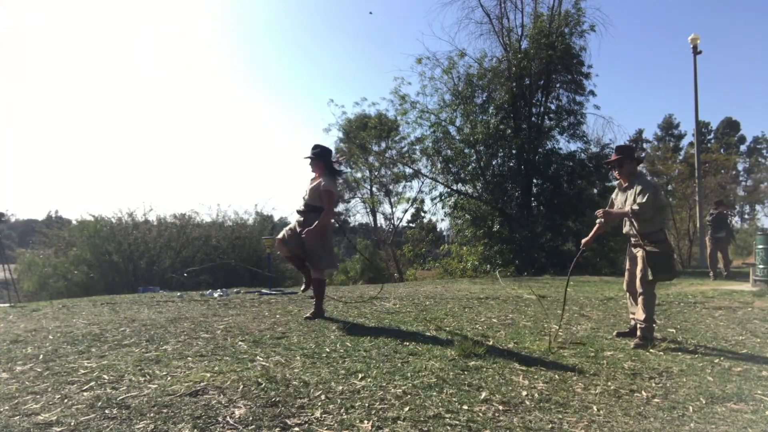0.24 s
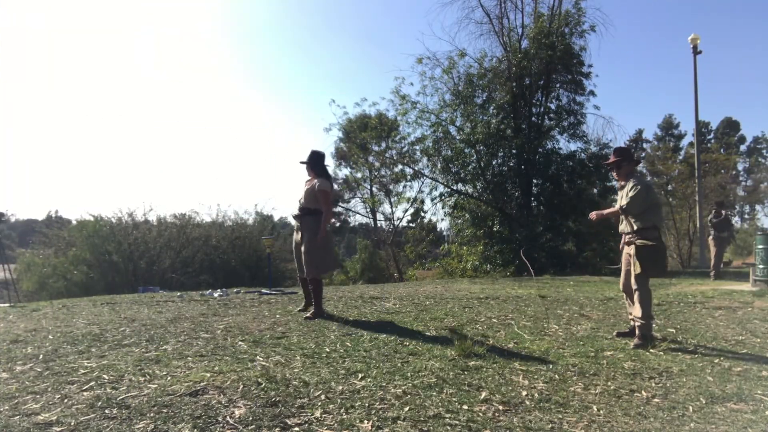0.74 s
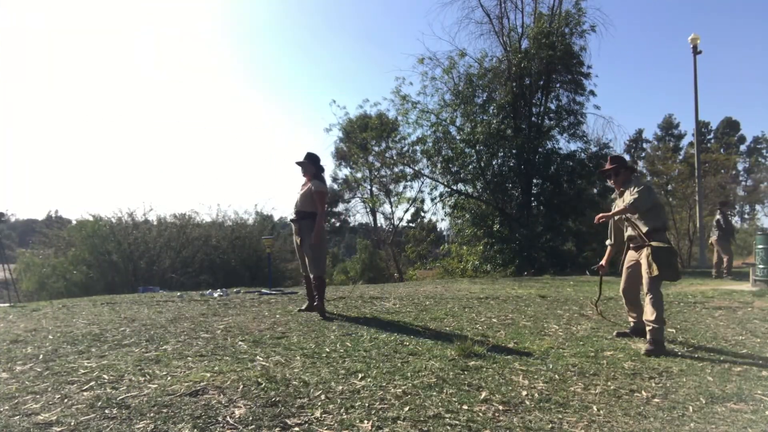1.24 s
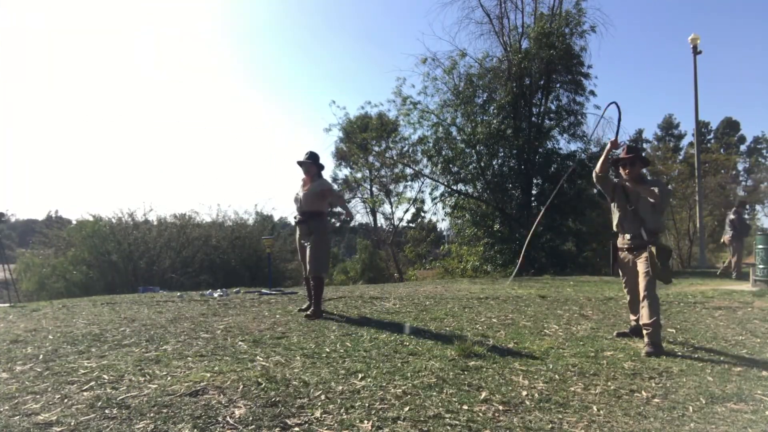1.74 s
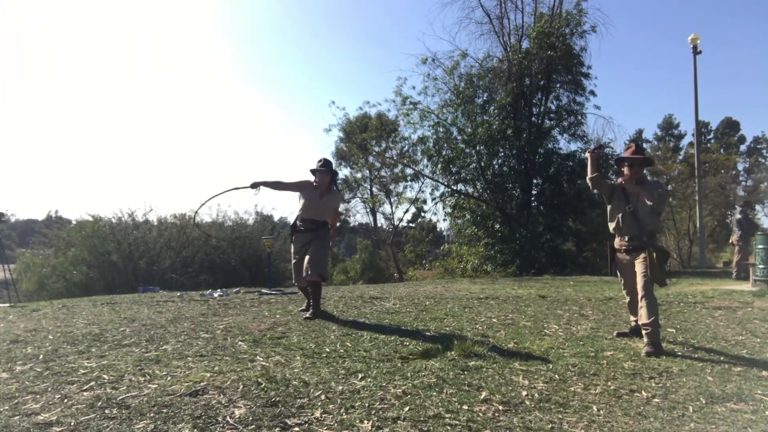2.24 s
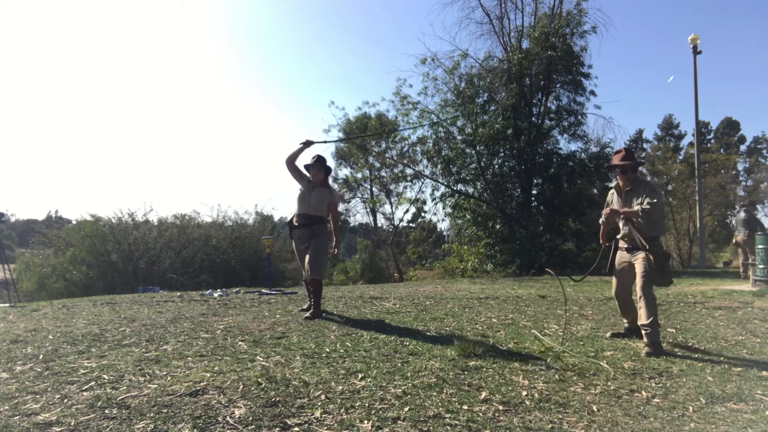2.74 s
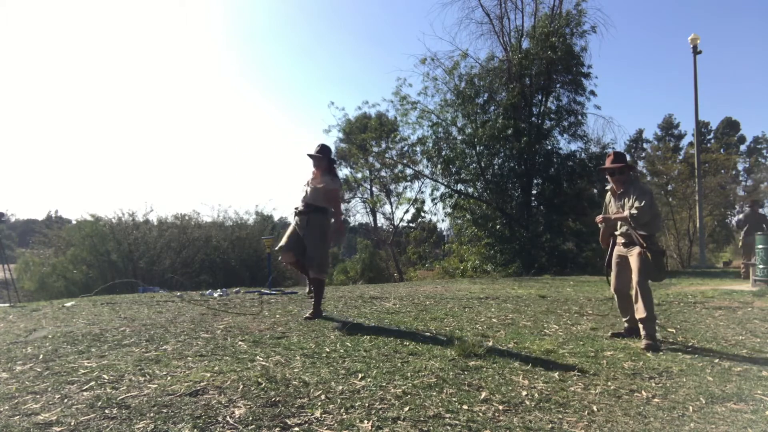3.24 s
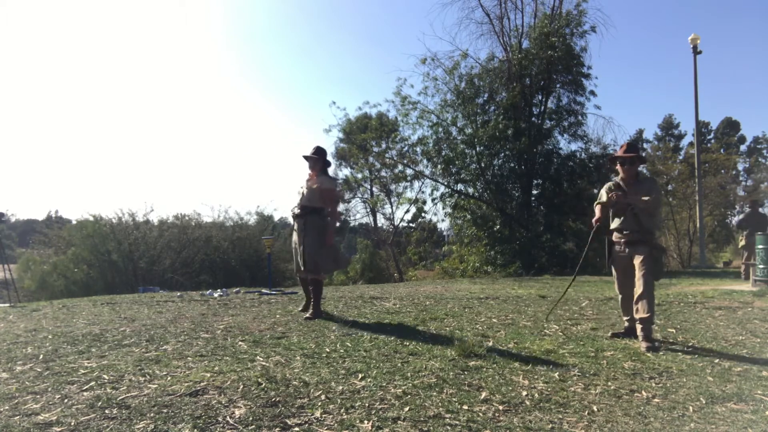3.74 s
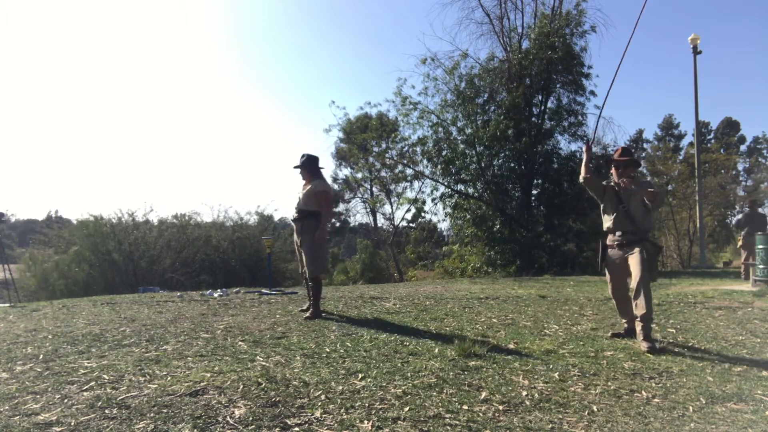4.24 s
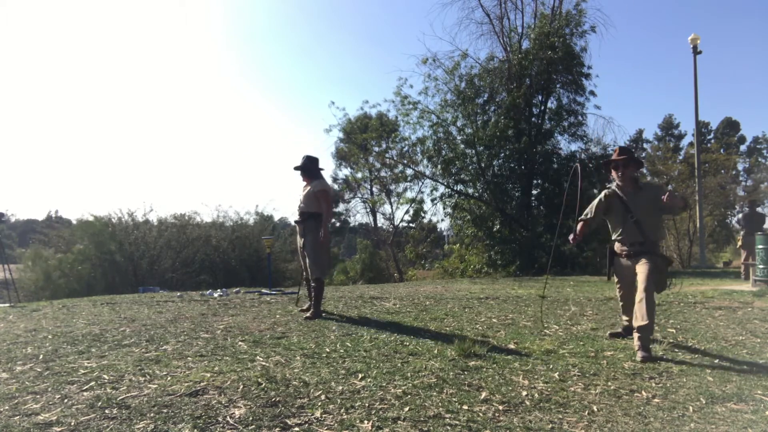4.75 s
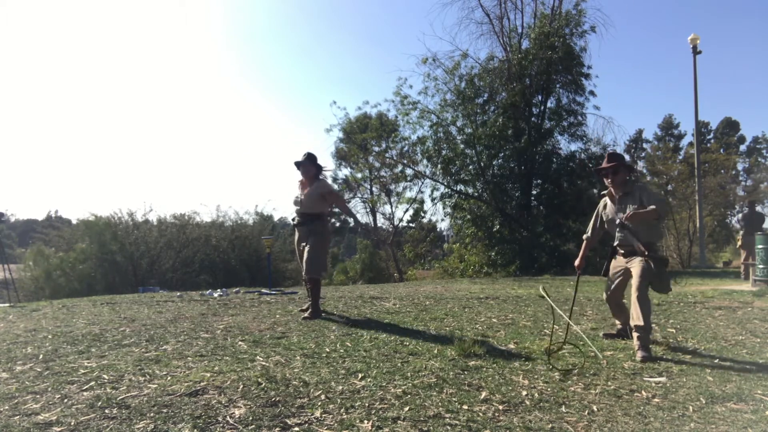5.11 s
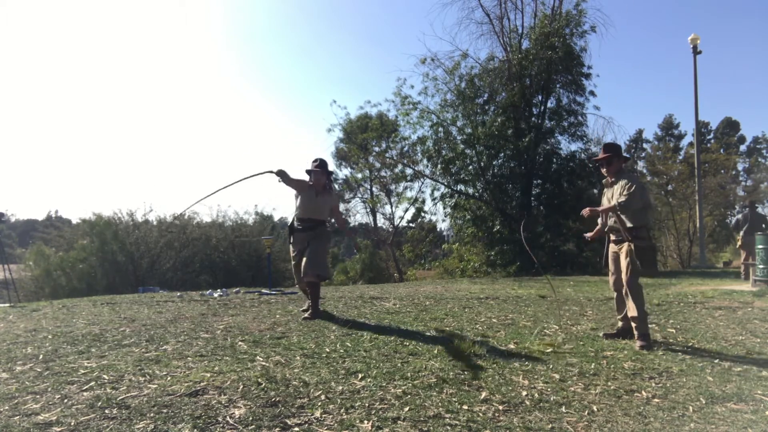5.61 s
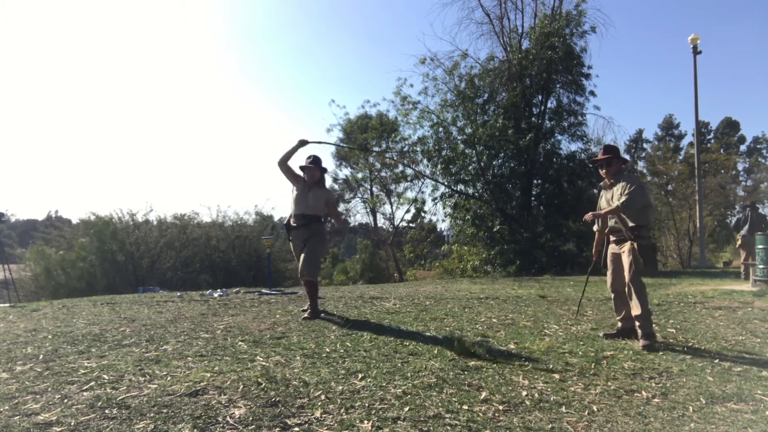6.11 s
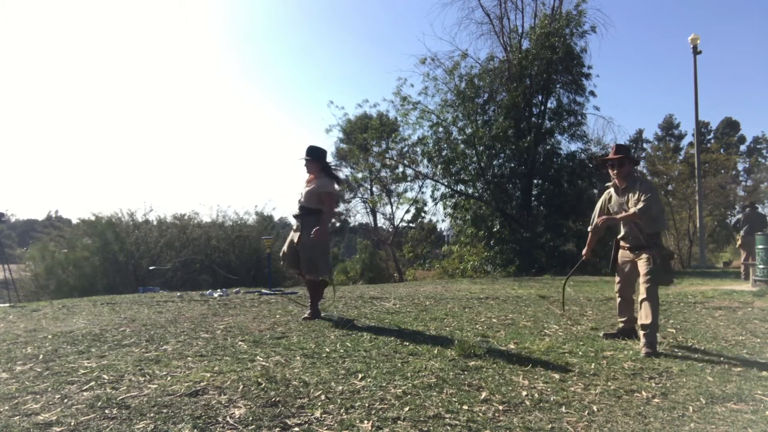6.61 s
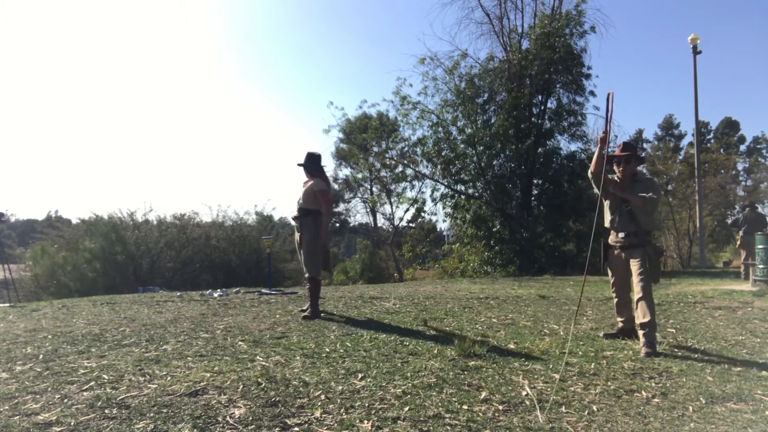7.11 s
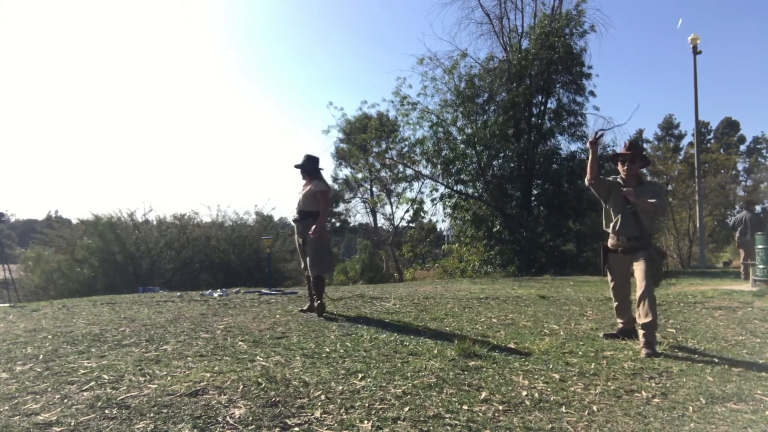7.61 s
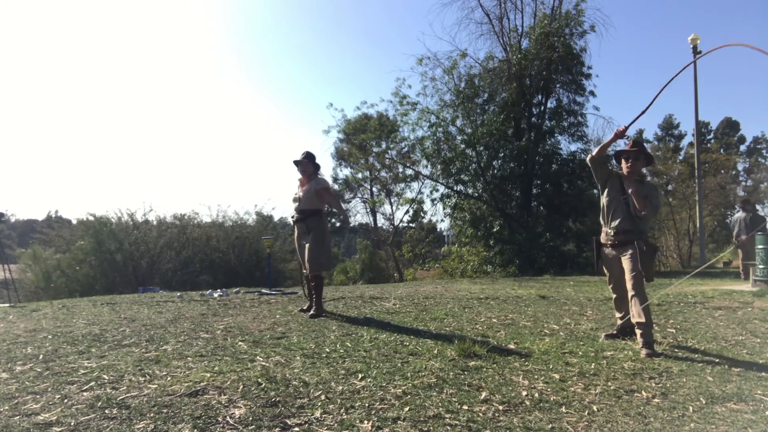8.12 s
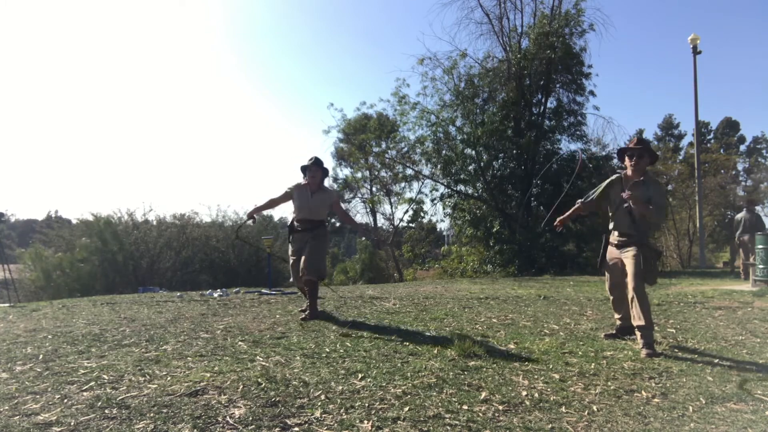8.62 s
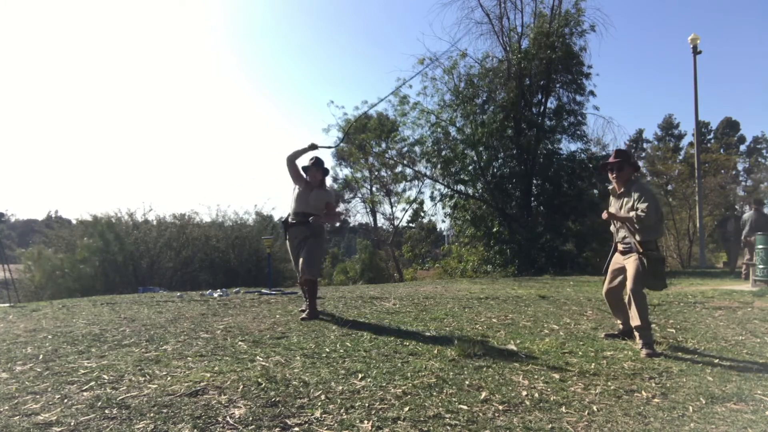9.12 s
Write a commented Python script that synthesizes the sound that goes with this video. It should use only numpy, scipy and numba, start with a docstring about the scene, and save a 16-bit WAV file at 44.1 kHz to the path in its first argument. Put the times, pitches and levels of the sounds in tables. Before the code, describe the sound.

Bullwhips crack on an open lawn, some metres from a microphone buffeted by low, gusty wind. A loud crack comes right at the start, a weaker one at about 1.1 seconds, then loud ones at 1.8, 2.6, 3.2, 4.9 and 6.4 seconds. A lighter snap at 7.2 seconds is followed by two heavy cracks at 8.0 and 8.7 seconds. Each is a sharp snap with a low thump, a quick slap of echo and a short tail scattering through trees. The hardest distort slightly and make the background dip for a moment. Between cracks the whips give thin whistling swishes, for example around 2.5, 4.0, 5.8 and 9.0 seconds, along with light ticks and faint drags through dry grass. The wind rumble continues throughout with occasional soft thuds, swelling at the end near 9.3 seconds, above a faint bed of distant traffic and leaves.

```python
"""Bullwhips crack on an open lawn, some metres from a phone whose microphone is buffeted by wind.
Each tip shrieks up through the sound barrier; its shock overloads the input into a falling thump,
slaps back off walls and scatters in the trees. Between cracks the thongs whistle, tick and drag through
dry grass, over a bed of distant traffic and leaves. The heaviest blows clip, and the gain control
ducks after them."""
import sys
import numpy as np
from scipy import signal
from scipy.fft import rfft, irfft
from scipy.io import wavfile
from scipy.ndimage import uniform_filter1d, minimum_filter1d
from numba import njit

SR = 44100
rng = np.random.default_rng(int(sys.argv[2]) if len(sys.argv) > 2 else 0)


def to_wav(sig):
    """Store sig (one row per channel, or 1-D mono) as 16-bit WAV at the path in sys.argv[1].

    Samples outside -1..1 are clipped; the rate is SR.
    """
    pcm = np.clip(np.atleast_2d(sig), -1, 1) * 32767
    pcm = np.round(pcm).astype(np.int16)
    wavfile.write(sys.argv[1], SR, pcm.T)  # frames by channels


N = 412776

# tone of the traffic and leaves: (frequency [Hz], relative density [dB])
PARK_SPECTRUM = [(90, -8), (190, 4), (270, -3.4), (400, -1.5), (994, -5), (1720, -14.5), (1850, -17.5),
                 (2660, -24.5), (3830, -28), (6130, -34.5), (15000, -40.5)]
# tone of the wind rumble: (frequency [Hz], relative density [dB])
WIND_SPECTRUM = [(12, -51), (20, -17.5), (43, -5.5), (59, 0), (103, -5), (145, -6), (236, -7.5),
                 (369, -15.5), (475, -29.5), (700, -30.5), (910, -60.5), (1540, -120)]
# wind level ride: (time [s], level [dB], upper band against the lows [dB])
WIND_GUSTS = [(0, -12, 2.5), (.2, -21.5, -2), (.65, -23.5, -9.5), (.72, -23, 6), (.9, -12, -12.5),
              (1.1, -17, -4.5), (1.4, -18, -1.5), (1.6, -22, -5), (1.75, -17, 1.5), (1.95, -24, -12),
              (2.2, -14.5, -11), (2.4, -22.5, -9.5), (2.75, -21.5, -6.5), (2.9, -13.5, -8.5),
              (3.15, -19.5, -4), (3.451, -24.5, -15), (3.9, -27, -13.5), (4.3, -26, -11.5),
              (4.65, -19, -2.5), (5.1, -18, -8), (5.399, -31.5, -15.5), (5.55, -22, -1),
              (6.0, -17.5, -11.5), (6.301, -22, -6.5), (6.7, -30, -14), (6.75, -18.5, -1.5),
              (7.1, -23.5, -4.5), (7.3, -17, -5.5), (7.6, -22.5, -9), (7.72, -16, -10.5),
              (7.87, -18.5, -4.5), (7.95, -23, -10), (8.321, -25, -17), (8.45, -16.5, -2.5),
              (8.7, -17.5, -2.5), (9.0, -30.5, -3.5), (9.12, -19, -8.5), (9.198, -26.5, -18),
              (9.35, -10.5, -11)]
# single eddies hitting the microphone port: (time [s], level [dB], pitch [Hz])
EDDY_THUDS = [(0.21, -12, 188), (0.36, -14, 160), (0.715, -5, 140), (0.919, -6, 192), (1.165, -2, 63.7),
              (1.243, -6, 134), (1.424, -8.5, 201), (2.968, -11, 210), (4.859, -9.5, 206),
              (5.498, -16, 172), (5.55, -9, 170), (5.584, -9.5, 248), (5.643, -10, 158), (5.987, -4, 170),
              (6.736, -10.5, 150), (6.952, -10, 146.5), (7.544, -9, 175), (7.7, -6.5, 132),
              (8.403, -18.5, 225), (9.145, -19, 242)]
# thong dragged through dry grass: (time it whips free [s], level [dB], drag length [s])
GRASS_DRAGS = [(2.401, -57, 0.06), (3.83, -62, 0.061), (3.971, -41.5, 0.03), (4.035, -42.5, 0.038),
               (4.661, -54, 0.029), (4.861, -48, 0.047), (5.698, -60, 0.092), (5.874, -53, 0.0054),
               (7.122, -45, 0.021), (7.15, -54, 0.11), (7.856, -55, 0.057), (7.95, -50, 0.085)]
# thong swishes: (time [s], length [s], first pitch [Hz], last pitch [Hz], whistle level [dB],
# hiss level [dB], hiss half-length [s])
THONG_SWINGS = [(.001, 0.08, 2530, 3630, -30.5, -41, 0.024), (1.779, 0.036, 2950, 1205, -22, -32, 0.013),
                (2.46, 0.14, 1887, 703, -30.5, -41, 0.019), (2.598, 0.12, 2030, 2356, -22, -34.5, 0.03),
                (4.031, 0.1, 1400, 848, -30.5, -41, 0.02), (4.865, 0.07, 1800, 2105, -26.5, -35.5, 0.027),
                (1.059, 0.022, 2500, 4530, -41, -54, 0.01), (7.163, 0.011, 1940, 4450, -35, -42, 0.022),
                (7.955, 0.026, 2513, 3000, -52.5, -33, .015),
                (5.758, 0.038, 1426, 2670, -31.5, -45.5, 0.014), (5.767, 0.1, 1826, 870, -29, -46, 0.022),
                (8.41, 0.033, 1284, 2020, -32, -50, 0.012), (8.971, 0.105, 2200, 797, -31, -40, 0.011)]
# thong ticking on grass or itself: (time [s], level [dB], centre [Hz])
THONG_TICKS = [(0.3306, -38, 2880), (0.561, -39, 2790), (1.4533, -29.5, 1560), (1.892, -35, 1510),
               (2.3464, -36.5, 1440), (2.8458, -17, 3480), (3.6823, -36, 1385), (3.8296, -40, 1890),
               (3.9718, -36.5, 2650), (3.9905, -33, 1270), (5.1112, -23, 4440), (5.176, -26.5, 3190),
               (6.1735, -39.5, 1405), (6.5512, -21, 1230), (7.119, -28, 2650), (8.1963, -26, 3480),
               (8.4956, -32, 1310), (8.9355, -29, 3560), (9.077, -33, 1900), (9.2433, -30, 1740)]
# slapback off walls and poles: (time [s], level [dB], centre [Hz], t60 [s])
WALL_SLAPS = [(0.08, -6.5, 1050, 0.019), (1.098, -22, 3620, 0.013), (1.116, -19, 2820, 0.031),
              (1.145, -14.5, 1270, 0.014), (1.172, -23, 2290, 0.019), (1.801, -28, 3576, 0.015),
              (2.649, -5.5, 2770, 0.012), (2.666, 13.5, 1730, 0.01), (2.676, -1.5, 3087, 0.016),
              (2.687, -5, 2540, 0.016), (3.198, -12, 2450, 0.028), (4.926, -1.5, 2700, 0.015),
              (4.944, -14, 4170, 0.027), (6.472, -14.5, 1110, 0.033), (8.013, 6.5, 1073, 0.0069),
              (8.76, 0.5, 1630, 0.015), (8.775, -12, 2960, 0.065)]
# colour of the tree tail and its loss in air: (low edge [Hz], high edge [Hz], level [dB], loss [dB/s])
SCATTER_BANDS = [(400, 770, -15, 27), (924, 1650, -7, 9), (1830, 3240, -6.5, -1.5), (3240, 4400, -9, 11.5),
                 (4530, 7000, -13.5, 18), (6600, 6900, -24.5, 36), (7560, 11000, -13, 87.5),
                 (11800, 16000, -15, 125)]
# the tip breaks the sound barrier in several kinks: (delay [s], relative level [dB], N-wave length [s])
SHOCK_KINKS = [(.0005, -4.5, .0002), (.0014, 0.15, .001), (.0037, -5.5, .0002)]
# whip cracks: (time [s], thump level [dB], thump decay [s], shock level [dB], shriek level [dB],
# shriek pitch [Hz], lawn bounce [dB], pre-tick level [dB], scatter gain [dB], extra late scatter [dB],
# tree-line swell [dB])
WHIP_CRACKS = [(0.0519, 3, 0.0091, 2.5, -7, 3855, -1.5, -32, -15, -0.9, 3.5),
               (1.0767, -11, 0.0088, -17, -50, 2980, -9.5, -50, -26, 6.5, 0),
               (1.7775, 6.5, 0.0069, 4.5, -2, 5500, -0.5, -54.5, -31.5, -7, 2.1),
               (2.6399, 1.5, 0.0053, 5.5, -8.5, 6300, 1, -55, -10, -0.9, 8),
               (3.169, 6.5, 0.028, -12.5, -9, 3740, 9.5, -15.5, -18, -2.5, -4),
               (4.9018, 6, 0.028, 1, -32.5, 3920, 0.5, -20, -14, -3, 4),
               (6.4435, 7, 0.025, -6.5, -8, 4090, 4, -17, -20.5, -0.5, 0.5),
               (7.177, -6, 0.0093, -7.5, -23, 6000, -12, -50.5, -30, -25, 8),
               (7.9856, 8.5, 0.022, -0.5, -5.5, 4100, -5, -15.5, -11, -4.5, 0.5),
               (8.7331, 5.5, 0.031, 3.5, 2.5, 4770, 2, -24, -17, 0.5, 6)]

PARK_DB, BUFFET_DB, BUFFETS_PER_S, THUD_CYCLES = -43.5, 1.59, 22, 1.9
DRAG_RISE_DB, FREE_T60_S = 23, .14
WAVER_RISING, WAVER_FALLING = .2, .085  # a thong gaining speed hisses, a slowing one whistles
NEAR_FROM_S, NEAR_DB, NEAR_DB_PER_S = .054, -7.5, 152
FAR_DB, FAR_DB_PER_S = -23, 17.5
TREE_LINE_S, TREE_LINE_SPREAD_S = .27, .047
SHRIEK_LEAD_S, PRE_TICK_LEAD_S = .0012, .022
DUCK_FROM_DB, DUCK_POWER, DUCK_HOLD_S, DUCK_TREBLE_SHARE = -4.5, 2.9, .16, .4
RECOVER_S, RECOVER_SHARE, TOP_HZ = .41, .9, 16000


def undb(db):
    return 10 ** (np.asarray(db) / 20)


def unit(x):
    return x / np.sqrt(np.mean(x ** 2))


def add(out, s, x):
    """Mix x in from time s."""
    i = max(int(s * SR), 0)
    out[i:i + len(x)] += x[:N - i]


def shaped_noise(spectrum):
    """Noise EQ'd through (Hz, dB) points, rms 1."""
    hz, db = np.transpose(spectrum)
    bins_hz = np.arange(N // 2 + 1) * SR / N + 1
    eq = undb(np.interp(np.log(bins_hz), np.log(hz), db))
    return unit(irfft(rfft(rng.standard_normal(N)) * eq, N))


def wander(rate):
    """Random modulator: levels held 1 / rate s and slewed twice."""
    hold = int(SR / rate)
    steps = np.repeat(rng.standard_normal(N // hold + 1), hold)
    return unit(uniform_filter1d(uniform_filter1d(steps, hold), hold)[:N])


@njit
def bandpass(x, hz, q):
    """State-variable band-pass."""
    y, band, low = np.empty(len(x)), 0., 0.
    g = np.tan(np.pi * hz / SR)
    for i in range(len(x)):
        v = (band + g * (x[i] - low)) / (1 + g * (g + 1 / q))
        band, low, y[i] = 2 * v - band, low + 2 * g * v, v / q
    return y


def noise_band(count, hz, q):
    """Noise around hz, rms 1."""
    return unit(bandpass(rng.standard_normal(count), float(hz), q))


def burst(db, hz, t60, top_hz):
    """A sharp puff of noise dying in t60; rough surfaces dull its top."""
    t = np.arange(int(t60 * SR) + 30) / SR
    puff = noise_band(len(t), hz, q=1.6) + .3 * rng.standard_normal(len(t))
    dull = signal.butter(3, top_hz, fs=SR)
    return signal.lfilter(*dull, undb(db - 60 * t / t60) * puff)


def whistle(hz, waver):
    """A tone along hz whose pitch and strength waver with the shed vortices."""
    bend, flutter = [unit(uniform_filter1d(rng.standard_normal(len(hz)), 60)) for _ in range(2)]
    phase = 2 * np.pi * np.cumsum(hz * (1 + waver * bend)) / SR
    return np.sin(phase) * undb(4.5 * flutter)


def park():
    """A bed of distant traffic and leaves, swelling slowly."""
    return undb(PARK_DB + 1.3 * wander(1.5) + .8 * wander(12)) * shaped_noise(PARK_SPECTRUM)


def wind():
    """Eddies rumble on the microphone port; the upper band comes in short lumps."""
    s, level_db, upper_db = np.transpose(WIND_GUSTS)
    t = np.arange(N) / SR
    eddies = shaped_noise(WIND_SPECTRUM)
    low = signal.sosfilt(signal.butter(2, 200, fs=SR, output="sos"), eddies)
    lumps, buffets = wander(35), BUFFET_DB * wander(BUFFETS_PER_S)
    upper = unit((eddies - low) * undb(4.5 * lumps + 2.2 * buffets))
    low = unit(low * undb(3.1 * lumps + 1.1 * wander(17) + buffets))
    return undb(np.interp(t, s, level_db)) * (low + undb(np.interp(t, s, upper_db)) * upper)


def eddy_thuds():
    """Single eddies hit the port, each a soft thud of about two pressure cycles."""
    out = np.zeros(N)
    for s, db, hz in EDDY_THUDS:
        t = np.arange(int(THUD_CYCLES / hz * SR)) / SR
        add(out, s, undb(db) * np.hanning(len(t)) * np.sin(2 * np.pi * hz * t))
    return out


def grass_rustle():
    """Blades rustle ever louder under the dragged thong and fall still once it is free."""
    out = np.zeros(N)
    for s, db, drag_s in GRASS_DRAGS:
        t = np.arange(-2 * drag_s, FREE_T60_S, 1 / SR)
        blades = undb(4.4 * np.repeat(rng.standard_normal(len(t) // 120 + 1), 120)[:len(t)])
        shape_db = np.where(t < 0, DRAG_RISE_DB * t / drag_s, -60 * t / FREE_T60_S)
        add(out, s + t[0], undb(db + shape_db) * unit(blades * noise_band(len(t), 9000, q=.21)))
    return out


def thongs():
    """A vortex whistle glides with the speed of the thong, layered with tip hiss and light ticks."""
    out = np.zeros(N)
    for s, length, first_hz, last_hz, whistle_db, hiss_db, hiss_s in THONG_SWINGS:
        progress = np.linspace(0, 1, int(length * SR))
        glide_hz = first_hz * (last_hz / first_hz) ** progress
        body = whistle(glide_hz, WAVER_RISING if last_hz > first_hz else WAVER_FALLING)
        thin_end = .49 * whistle(2.2 * glide_hz, waver=.16) * (1 - progress) ** 2
        fades = np.minimum(1, 12 * progress) * np.minimum(1, 8 * (1 - progress))
        add(out, s, undb(whistle_db - 11 * progress) * fades * (body + thin_end))
        swell = np.hanning(int(2 * hiss_s * SR))
        add(out, s - .2 * hiss_s, undb(hiss_db) * swell * noise_band(len(swell), 4500, q=.8))
    for s, db, hz in THONG_TICKS:
        add(out, s, burst(db, hz, t60=.012, top_hz=4800))
    return out


def tree_scatter(t, scatter_db, late_db, swell_db):
    """The one-second tail: near crowns answer first and fade fast, the far wood lingers."""
    grain = undb(2 * np.repeat(rng.standard_normal(SR // 150), 150))  # single trunks and branches
    scatter = 0
    for low_hz, high_hz, db, loss_db_per_s in SCATTER_BANDS:
        sos = signal.butter(2, [low_hz, high_hz], "band", fs=SR, output="sos")
        echoes = unit(signal.sosfilt(sos, grain * rng.standard_normal(SR)))
        scatter += undb(db - loss_db_per_s * t) * echoes
    near = undb(NEAR_DB - NEAR_DB_PER_S * np.maximum(t - NEAR_FROM_S, 0))
    far = undb(FAR_DB - FAR_DB_PER_S * t)
    tree_line = np.exp(-((t - TREE_LINE_S) / TREE_LINE_SPREAD_S) ** 2)  # far trees answer together
    ride_db = scatter_db + late_db * np.minimum(t / .1, 1) + swell_db * tree_line
    fade_out = np.minimum(1, 10 * (1 - t))
    return undb(ride_db) * (near + far) * fade_out * scatter


def overload_thump(t, decay_s):
    """The overloaded input's high-pass stages swing back ever slower: a thump that drops in pitch."""
    attack = 1 - np.exp(-(t / .003) ** 2)
    return np.cos(np.pi * np.sqrt(960 * t)) * attack * np.exp(-(t / decay_s) ** 2)


def tip_shriek(t, hz):
    """The tip speeds up: a fast riser that peaks at t = 0, passing through hz, and is cut off."""
    swell = np.exp(-np.abs(t) / .0014) + .06 * np.exp(-np.abs(t) / .0077)
    tone = whistle(hz * np.exp(t / .0065), waver=.05)
    return swell * (tone + .35 * noise_band(len(t), 7000, q=.6))


def whip_cracks():
    """The supersonic tip snaps in N-shaped shocks, layered with shriek, thump, tree tail and slapback."""
    out, t = np.zeros(N), np.arange(SR) / SR
    run_up = np.arange(-.03 * SR, .003 * SR) / SR
    for s, thump_db, thump_s, shock_db, shriek_db, shriek_hz, lawn_db, tick_db, *tail in WHIP_CRACKS:
        add(out, s - SHRIEK_LEAD_S + run_up[0], undb(shriek_db) * tip_shriek(run_up, shriek_hz))
        for delay, db, length in SHOCK_KINKS:
            n_wave = np.linspace(1, -1, int(length * SR) + 2)
            add(out, s + delay, undb(shock_db + db) * n_wave)
        add(out, s, undb(thump_db) * overload_thump(t, thump_s))
        add(out, s + .0005, burst(lawn_db, hz=1100, t60=.008, top_hz=3000))  # bounce off the lawn
        add(out, s - PRE_TICK_LEAD_S, burst(tick_db, hz=2200, t60=.009, top_hz=8000))
        add(out, s, tree_scatter(t, *tail))
    for s, db, hz, t60 in WALL_SLAPS:
        add(out, s, burst(db, hz, t60, top_hz=8000))
    return out


def scene():
    """Mono mix of the whips, the wind and the park bed."""
    return (whip_cracks() + thongs() + grass_rustle() + wind() + eddy_thuds() + park())[None]


def record(dry):
    """Gain control too slow for the blow ducks the bass most; then hard clipping and a steep top cut."""
    envelope = uniform_filter1d(np.abs(dry[0]), int(.03 * SR))
    target = np.minimum(1, undb(DUCK_FROM_DB) / envelope) ** DUCK_POWER
    held = minimum_filter1d(target, int(DUCK_HOLD_S * SR))
    lag = int((DUCK_HOLD_S / 2 + .03) * SR)
    gain = uniform_filter1d(np.r_[np.ones(lag), held[:-lag]], int(.025 * SR))
    pole = np.exp(-1 / (RECOVER_S * SR))
    slow_release = np.exp(RECOVER_SHARE * signal.lfilter([1 - pole], [1, -pole], np.log(gain)))
    bass = signal.sosfiltfilt(signal.butter(1, 1000, fs=SR, output="sos"), dry)
    ducked = gain * bass + slow_release * gain ** DUCK_TREBLE_SHARE * (dry - bass)
    top_cut = signal.ellip(8, .2, 70, TOP_HZ, fs=SR, output="sos")
    return signal.sosfilt(top_cut, np.clip(ducked, -1, 1))


dry = scene()
out = record(dry)
to_wav(out)
```